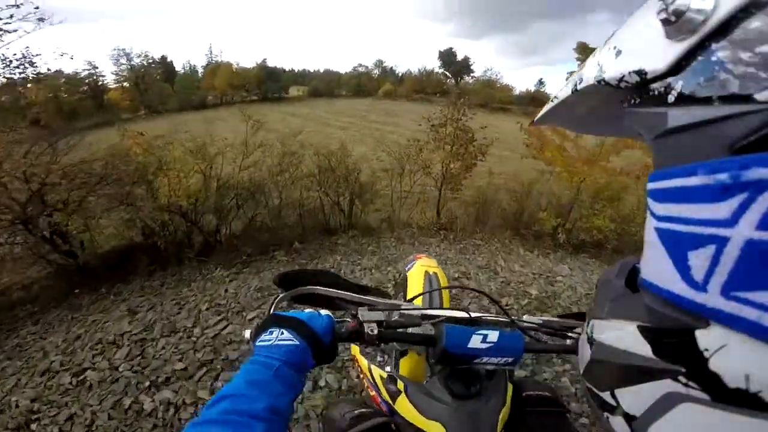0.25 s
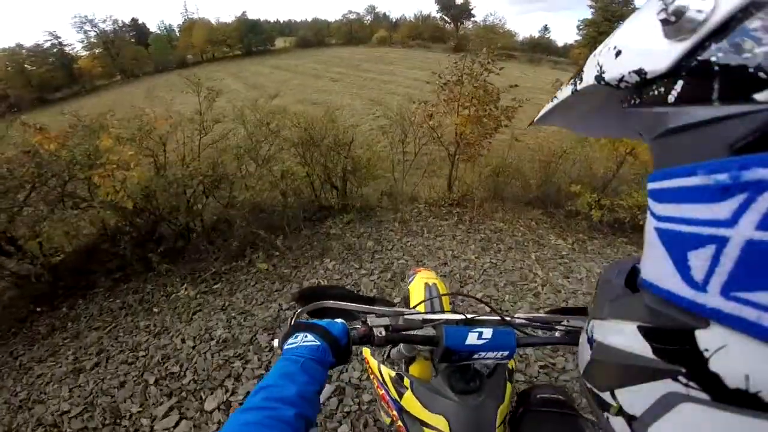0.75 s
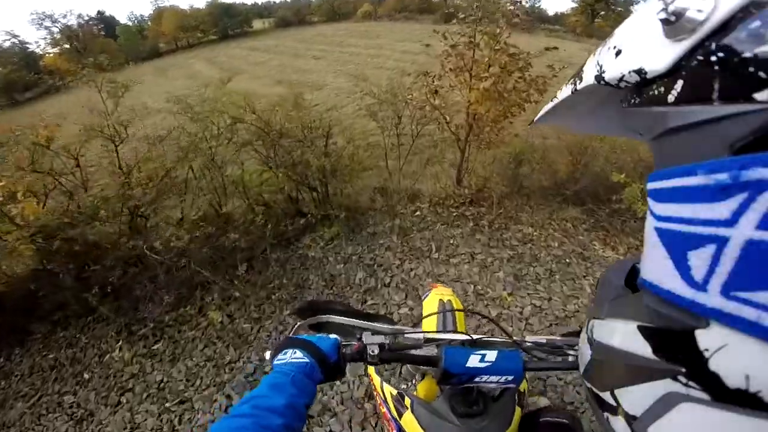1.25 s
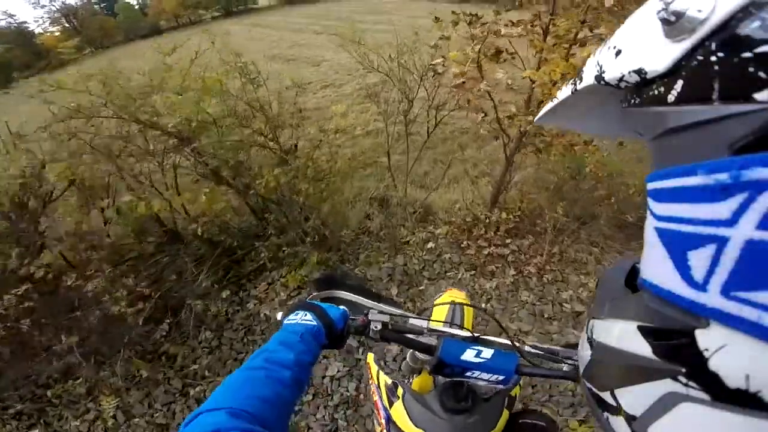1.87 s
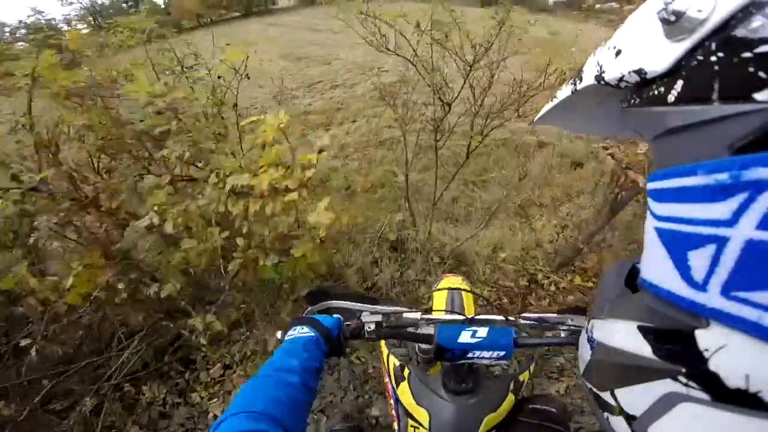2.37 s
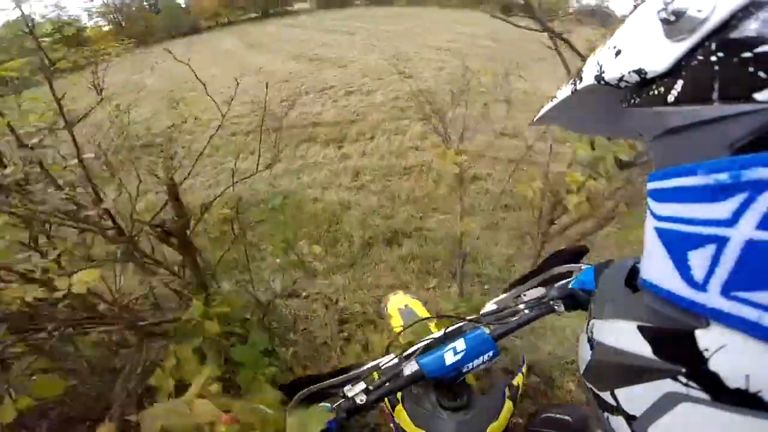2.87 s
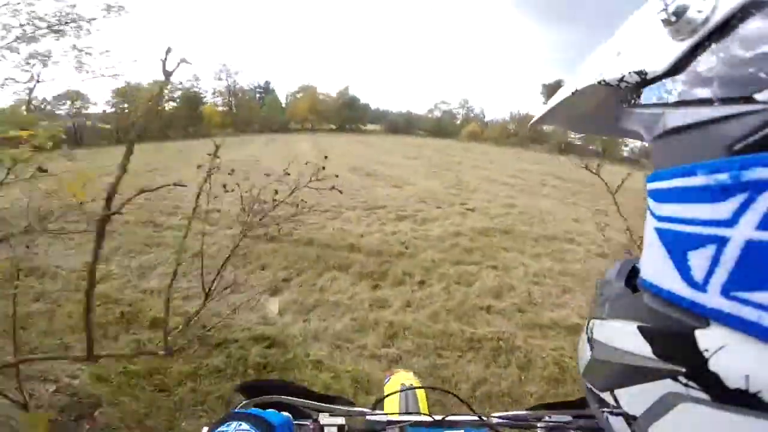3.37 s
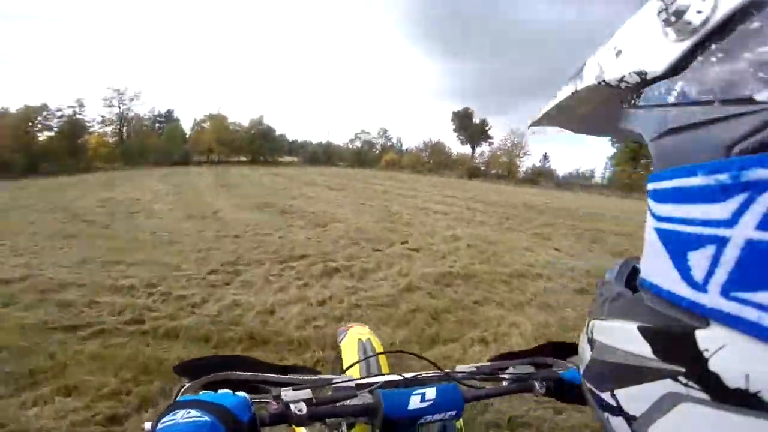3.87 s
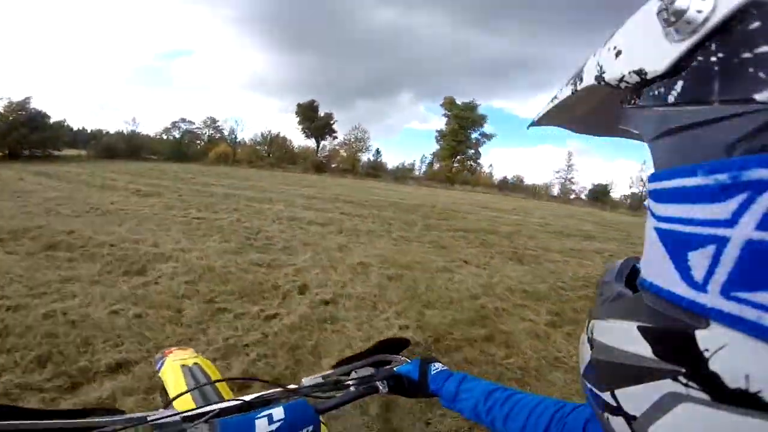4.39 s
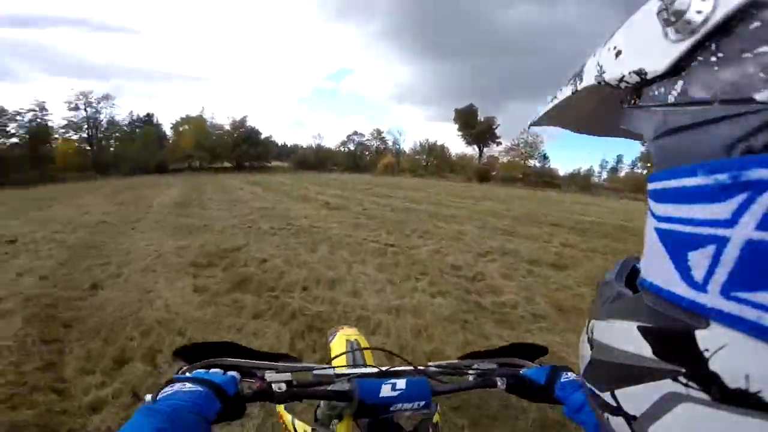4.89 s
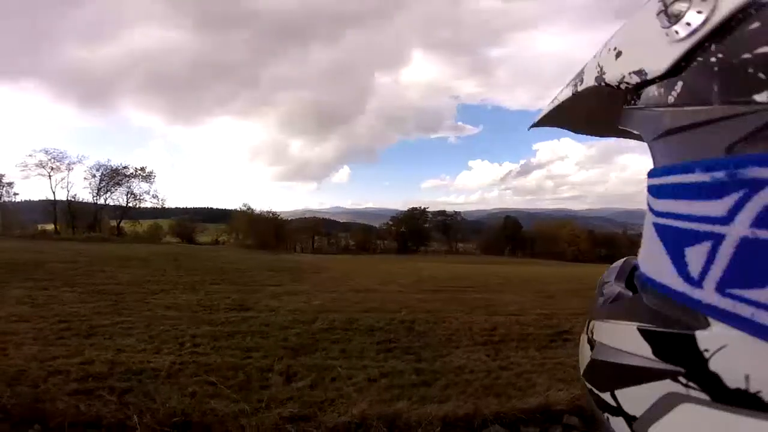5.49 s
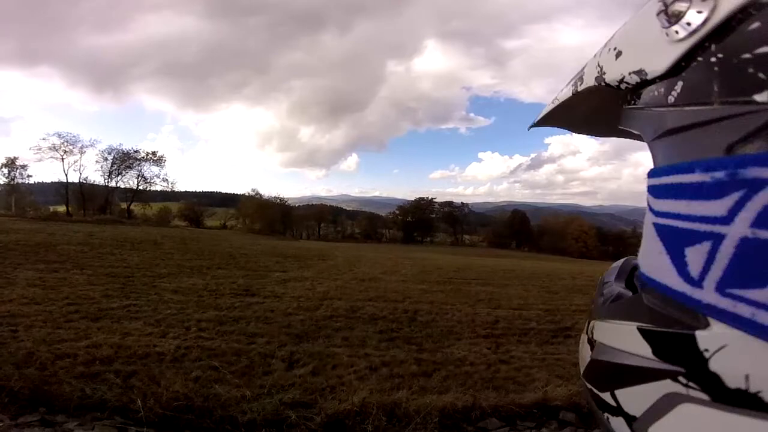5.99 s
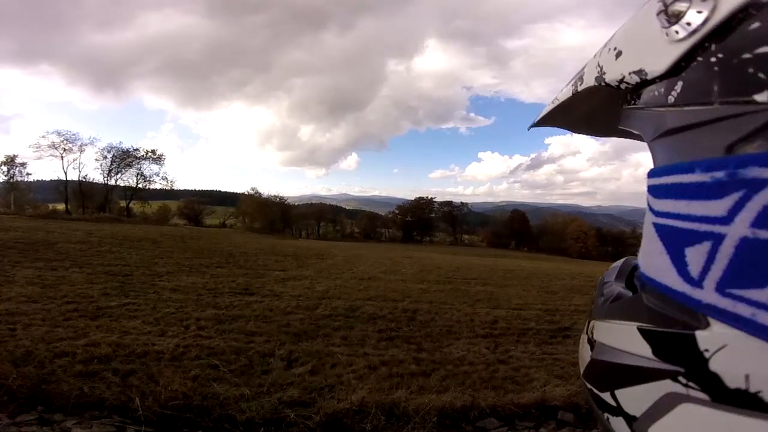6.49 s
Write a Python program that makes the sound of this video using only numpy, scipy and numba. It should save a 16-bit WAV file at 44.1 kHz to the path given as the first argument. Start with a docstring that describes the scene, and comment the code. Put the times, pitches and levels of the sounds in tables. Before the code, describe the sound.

A dirt bike idles unevenly over crunching stones, scrapes through a bush, then revs across grass before cutting abruptly to faint, gusty wind.

```python
"""A single-cylinder four-stroke off-road bike, heard from a camera beside the helmet, idles over loose stones:
uneven pops and pumping thumps with many weak firings, over noise ringing the cases, crunching ground and ticks.
It pushes through a bush in a flurry of struck resonances, then opens up across a meadow: faster pops bark and rasp,
low orders drone, the cases whine and a loose part buzzes.
A hard cut leads to a still, windy field: low buffeting, single puffs on the microphone and a faint noise bed."""
import sys
import numpy as np
from scipy import signal
from scipy.fft import rfft, irfft
from scipy.io import wavfile
from scipy.ndimage import uniform_filter1d
from numba import njit

SR = 44100
rng = np.random.default_rng(int(sys.argv[2]) if len(sys.argv) > 2 else 0)


def digitize_waveform(pressure):
    """Quantize a signal to 16-bit integers and store it at the path in sys.argv[1].

    Rows of a 2-D input are taken as channels; values are limited to [-1, 1].
    """
    field = np.atleast_2d(pressure).T
    bounded = np.clip(field, -1, 1)
    quanta = np.round(bounded * 32767).astype(np.int16)
    wavfile.write(sys.argv[1], SR, quanta)


N = 297521


def undb(db):
    """Gain of a level in dB."""
    return 10 ** (np.asarray(db) / 20)


def level(x, db):
    """Scale to an rms level."""
    return x * undb(db) / np.sqrt(np.mean(x ** 2))


def curves(table):
    """Each column of a (start_s, ..) table as a value per sample."""
    s, *columns = np.transpose(table)
    return [np.interp(np.arange(N) / SR, s, c) for c in columns]


@njit
def svf(x, hz, width):
    """State-variable band-pass, gain 1 at the centre."""
    y, b, l = np.empty(len(x)), 0., 0.
    g, k = np.tan(np.pi * hz / SR), width / hz
    for i in range(len(x)):
        v = (b + g * (x[i] - l)) / (1 + g * (g + k))
        b, l, y[i] = 2 * v - b, l + 2 * g * v, k * v
    return y


@njit
def glide(x, hz, width):
    """The same band-pass with a centre that moves."""
    y, b, l = np.empty(len(x)), 0., 0.
    for i in range(len(x)):
        g, k = np.tan(np.pi * hz[i] / SR), width / hz[i]
        v = (b + g * (x[i] - l)) / (1 + g * (g + k))
        b, l, y[i] = 2 * v - b, l + 2 * g * v, k * v
    return y


def band(x, hz, width_hz):
    """Steep band: the resonance applied twice."""
    return svf(svf(x, float(hz), float(width_hz)), float(hz), float(width_hz))


def coloured(x, spectrum):
    """Give white sound a (pitch_hz, density_db) spectrum."""
    hz, db = np.transpose(spectrum)
    f = np.log(np.arange(N // 2 + 1) * SR / N + 1)
    return irfft(rfft(x) * undb(np.interp(f, np.log(hz), db, left=-90, right=-90)), N)


def walk(rate):
    """Random levels held 1 / rate s and slewed twice; spread near 1."""
    k = int(SR / rate)
    steps = np.repeat(rng.standard_normal(N // k + 1), k)
    return 1.87 * uniform_filter1d(uniform_filter1d(steps, k), k)[:N]


def grains(rate, spread_db, tail_s):
    """Noise that comes in short bursts of uneven size."""
    sizes = undb(spread_db * np.minimum(rng.exponential(size=N), 3.5))
    starts = (rng.random(N) < rate / SR) * sizes
    tails = signal.lfilter([1], [1, -np.exp(-1 / (tail_s * SR))], starts)
    return tails * rng.standard_normal(N)


def delayed(x, s):
    """The same sound s seconds later."""
    return np.r_[np.zeros(int(s * SR)), x][:N]


def bursts(table, width_s):
    """A bell-shaped swell of gain at each (start_s, gain_db) row, centred there."""
    t = np.arange(N) / SR
    return sum(undb(db) * np.exp(-((t - s) / width_s) ** 2 / 2) for s, db in table)


# engine speed: start_s [s], firing_rate [firings per second]
SPEED = [(0.0, 22.15), (0.4, 21.68), (0.8, 23.99), (0.9, 22.82), (1.2, 21.99), (1.9, 23.14), (2.0, 21.84),
         (2.3, 21.34), (3.3, 22.34), (3.5, 20.92), (3.6, 24.0), (3.7, 36.35), (3.85, 38.12), (4.25, 31.28),
         (4.3, 31.41), (4.35, 28.32), (4.55, 27.66), (4.85, 32.33), (5.05, 32.25), (5.4, 36.61)]
START_TURN = -.215  # place in the cycle at the start
POP_S = .003  # s from the start of a cycle to its pop


def crank():
    """Cycle number, place in the cycle (0-1) and seconds since it began; the pop comes POP_S after that."""
    t, hz = np.arange(N) / SR, curves(SPEED)[0]
    turns = START_TURN + np.cumsum(hz) / SR + hz * POP_S
    whole = np.floor(turns)
    return whole.astype(int) + 1, turns % 1, t - np.interp(whole, turns, t)


# engine load: start_s [s], throttle [0-1], pop_db [dB], silencer_ring [share], upper_ring [share],
# pipe_echo [share], pumping_thump_db [dB]
LOAD = [(0, 0, -1.2, 1.2, .1, .25, -.8), (3.47, 0, -1.2, 1.2, .1, .25, -.8), (3.62, 1, 1.5, .1, .6, .5, -6),
        (3.82, 1, 1, .3, .8, .45, -9), (3.9, 1, -1.3, 1.4, .9, .22, -9), (4.2, 1, -1.8, 1.6, .6, .25, -11),
        (4.6, 1, -2, 1.9, 2.1, .33, -9), (4.75, 1, -2, 1.8, 2.1, .33, -9.5), (4.93, 1, 0, .4, .6, .33, -11),
        (5.4, 1, 0, .3, .7, .33, -11)]
# at idle a full burn spoils the next charge, so every second firing is weak:
# first_weak_s [s], last_weak_s [s], pop_db [dB relative to a full one]
WEAK_RUNS = [(.064, .064, -13), (.291, .291, -8), (.477, .655, -13), (.78, 1.493, -14), (1.623, 1.623, -14),
             (1.755, 2.02, -10), (2.066, 2.807, -17), (2.943, 3.214, -9), (3.26, 3.26, -9),
             (3.49, 3.49, -13), (.019, .019, -3), (.156, .156, -2), (.202, .202, -3), (.739, .739, -3),
             (1.581, 1.581, -3), (1.711, 1.711, -3), (1.974, 1.974, -3), (2.898, 2.989, -3.5),
             (3.305, 3.396, -6), (3.35, 3.35, -5.5), (3.442, 3.442, -2)]
# resonances of the exhaust pipe: pitch_hz [Hz], width_hz [Hz], gain_db [dB]
PIPE = [(62, 28, -1), (132, 13, 3)]
# low orders of the cycle that drone under load: order [times a cycle], level_db [dB], place [share of its period]
SHAKE = [(2, -27.5, .32), (4, -28, .39), (5, -30, .1)]
WEAK_SCATTER_DB, FULL_SCATTER_DB = 1.8, 1.1  # doubled at idle
POP_WIDTH_S, POP_JITTER_S, POP_ECHO_S = .00074, .00015, .0062
FRONT, TAIL = .7, 1.45  # the dip sets in much faster, the peak dies this much slower
SILENCER_HZ, IDLE_SILENCER_HZ, SILENCER_WIDTH_HZ = 316, 311.4, 75.  # cooler gas rings lower
SILENCER_WANDER = .068  # each idle firing differs by about this share
RASP_HZ, RASP_WIDTH_HZ, RASP_DB = 1220., 120., -13
RUSH_PHASE, RUSH_WIDTH, RUSH_DB = .896, .051, -36  # place and width as shares of the cycle
SURGE_S, SURGE_WIDTH_S, SURGE = .0104, .0017, .3
BARK_HZ, BARK_WIDTH_HZ, BARK_S, BARK_DB = 665., 85., .0085, -3
STROKE_START, STROKE_END = .24, .345  # share of the cycle where the pumping push starts and ends
PUSH_CURVE = 1.9  # how late in the stroke the push builds
THUMP_ECHO_S, THUMP_ECHO = .006, .37
TRAP_HZ, TRAP_WIDTH_HZ, TRAP = 100., 45., .75


def exhaust(cycle, phase, since):
    """A pop as the valve opens, then the piston's push, which is cut off sharply and rings the pipe."""
    throttle, pop_db, ring, upper, pop_echo, thump_db = curves(LOAD)
    idle = 1 - throttle
    draws = rng.standard_normal((200, 4))
    chance = draws[cycle].T  # four random values, new for each cycle

    weak_db = np.zeros(200)
    for first_s, last_s, db in WEAK_RUNS:
        weak_db[cycle[int(first_s * SR)]:cycle[int(last_s * SR)] + 1:2] = db
    weak_scatter = WEAK_SCATTER_DB * draws[:, 3]
    full_scatter = -FULL_SCATTER_DB * abs(draws[:, 3])
    scatter_db = np.where(weak_db < 0, weak_scatter, full_scatter)
    burn = undb(weak_db[cycle] + (2.0 - throttle) * scatter_db[cycle])

    # a puff of gas radiates as its slope: a dip, then a peak
    u = (since - POP_S - POP_JITTER_S * chance[3]) / POP_WIDTH_S
    u = np.clip(u, -1, 1) + np.minimum(u + 1, 0) / FRONT + np.maximum(u - 1, 0) / TAIL
    pop = u * np.exp(-u ** 2 / 2) * burn * undb(pop_db + .5 * chance[0])

    ring_hz = throttle * SILENCER_HZ + idle * IDLE_SILENCER_HZ * (1 + SILENCER_WANDER * chance[0])
    ring_gain = ring * undb((1.0 - 0.62 * throttle) * chance[1])
    pop = pop + ring_gain * glide(pop, ring_hz, SILENCER_WIDTH_HZ)
    pop = pop + upper * .6 * svf(pop, 500., 45.)
    # the sharp front of the puff rings a higher mode under load
    rasp = svf(np.exp(-8 * u ** 2), RASP_HZ, RASP_WIDTH_HZ)
    pop = pop + upper * undb(RASP_DB + 1.5 * chance[2]) * rasp
    pop = pop + pop_echo * delayed(pop, POP_ECHO_S)

    # gas rasps past the valve just before it pops
    rush_noise = level(band(rng.standard_normal(N), RASP_HZ, 240), RUSH_DB)
    rush = np.exp(-((phase - RUSH_PHASE) / RUSH_WIDTH) ** 2 / 2) * rush_noise
    # at idle a full burn comes back down the pipe as a slow surge
    v = (since - SURGE_S) / SURGE_WIDTH_S
    surge = SURGE * burn * v * np.exp(-v ** 2 / 2)
    pop = pop + upper * throttle * rush + idle * surge
    # a late ring follows each pop, strong under load
    bark = svf(delayed(np.exp(-2 * u ** 2), BARK_S), BARK_HZ, BARK_WIDTH_HZ)
    pop = pop + upper * undb(BARK_DB + chance[1]) * bark

    stroke = np.clip((phase - STROKE_START) / (STROKE_END - STROKE_START), 0, None)
    cut_off = STROKE_END + .01 * (1 - .8 * throttle) * chance[2]
    push = stroke ** PUSH_CURVE * (phase < cut_off)
    push = push * (.95 + .05 * burn) * undb(thump_db + (1.5 - throttle) * chance[1])
    push = uniform_filter1d(uniform_filter1d(push, size=36), size=34)
    # at idle burnt gas keeps flowing out after the pop; after a weak firing it is sucked back
    flow = idle * (.4 * burn - .24 + .09 * chance[2])
    push = push + flow * np.exp(-((since - .0055) / .0022) ** 2 / 2)

    # the open pipe end returns the push upside down
    edges = push - THUMP_ECHO * uniform_filter1d(delayed(push, THUMP_ECHO_S), size=40)
    edges = signal.lfilter(*signal.butter(1, 110, "high", fs=SR), edges)
    pipe = sum(undb(db) * svf(push, float(hz), float(w)) for hz, w, db in PIPE)
    shake = throttle * sum(undb(db) * np.cos(2 * np.pi * (round(k) * phase + at)) for k, db, at in SHAKE)
    gas = pop + edges + pipe
    # under load the pipe swallows a band
    return gas - TRAP * throttle * svf(gas, TRAP_HZ, TRAP_WIDTH_HZ) + shake


# engine cases and valve gear: pitch_hz [Hz], width_hz [Hz], idle_db [dB], open_throttle_gain_db [dB]
CASES = [(461, 252, 1.5, 0.5), (624, 137, 3, -1.5), (813, 160, -7.5, 2), (1094, 260, -8.5, 8.5),
         (1788, 616, 4, 0), (2075, 680, -5.5, -7), (3080, 480, -2, -0.5), (3376, 750, -13, 5),
         (4820, 440, -13, -4.5), (6130, 540, -17, -0.5), (7740, 310, -30.5, 4.5), (10090, 1100, -36, -10)]
# clatter over time: start_s [s], gain_db [dB], gain_under_1_khz_db [dB], gain_of_ring_near_850_hz_db [dB]
CLATTER = [(0, -32, 2, 10.5), (.95, -30.5, -4.5, 14), (1.3, -30, 1.5, 4), (2.7, -33.5, 3.5, -32),
           (3.1, -32, 8, -16), (3.5, -35.5, 6, 9), (3.8, -34, 8.5, -14), (4.15, -35.5, 1.5, 0),
           (4.4, -31.5, 5.5, 0.5), (4.8, -34.5, 6, -9), (5.4, -38, 10, -10)]


def clatter(phase):
    """Valve gear and gas noise in the case resonances, louder at valve events twice a cycle."""
    beat = 1 + 0.68 * np.exp(-phase / 0.69) + 0.31 * np.exp(-((phase + .5) % 1) / 0.087)
    drive = beat * (rng.standard_normal(N) + level(grains(400, 3.7, 0.0035), -2.3))
    throttle = curves(LOAD)[0]
    all_db, low_db, ring_db = curves(CLATTER)
    # under load the lower resonances sound while the gas leaves
    outflow = 1 + throttle * (1.3 * np.exp(-((phase - .36) / .1) ** 2 / 2) - .15)
    out = np.zeros(N)
    for hz, w, db, open_db in CASES:
        excitation = drive * (outflow if hz < 1000 else 1)
        gain_db = db + open_db * throttle + low_db * (hz < 1000) + ring_db * (750 < hz < 1000)
        out += level(band(excitation, hz, w), gain_db + 1.1 * walk(9))
    return undb(all_db - 5.5) * out


# a ring of the cases that sings under load: start_s [s], pitch_hz [Hz], gain_db [dB]
WHINE = [(3.5, 1700, -39), (3.68, 1646, -36.5), (3.9, 1625, -37.5), (4.25, 1610, -39.5), (4.5, 1615, -36),
         (4.75, 1675, -35.5), (4.9, 1797, -36.5), (5.4, 1800, -58)]
WHINE_WIDTH_HZ = 200.


def whine(phase):
    """Gas noise in one narrow gliding ring, strongest as each cycle begins."""
    hz, db = curves(WHINE)
    drive = (.5 + np.exp(-phase / .4)) * rng.standard_normal(N)
    ring = glide(glide(drive, hz, WHINE_WIDTH_HZ), hz, WHINE_WIDTH_HZ)
    return level(ring, 0) * undb(db) * curves(LOAD)[0]


# a loose part that buzzes once a cycle: start_s [s], gain_db [dB]
RATTLE = [(4.74, -78), (4.8, -52), (4.87, -47), (5.0, -50), (5.08, -49.5), (5.17, -75)]
RATTLE_PHASE = 0.6  # share of the cycle


def rattle(phase):
    """A thin buzz kicked at the same point of every cycle."""
    kick = np.exp(-((phase - RATTLE_PHASE) % 1) / 0.35)
    return level(kick * band(rng.standard_normal(N), 6200, 3900), 0) * undb(curves(RATTLE)[0])


# stones and twigs that strike bike or camera:
# start_s [s], gain_db [dB], centre_hz [Hz], crack_gain_db [dB], knock_gain_db [dB]
HITS = [(0.121, -6, 2210, -42, -7), (0.243, -22, 1690, -19, -14), (0.398, -14, 1660, -29, -20),
        (1.2734, -13, 2240, -30, -9), (2.3584, -12, 3220, -22, -26), (2.396, -18, 2120, -24, -25),
        (2.703, -10, 1900, -6, -16), (2.772, -14, 3200, -30, -25), (2.7785, -6.5, 3800, -15, -8),
        (2.9314, -10.5, 2980, -27, -8), (2.933, -12, 1705, -30, -2), (2.949, -8.5, 1400, -25, -12),
        (2.954, -10, 2900, -24, -28), (3.0425, -10.5, 3050, -28, 0.5), (3.092, -10, 1800, -25, -9.5),
        (3.1132, -9, 1930, -33, -9.5), (3.185, -3, 3220, -5.5, -17), (3.1848, -3, 1960, -16.5, -26),
        (3.191, 2, 1700, -19, -25.5), (3.193, -12, 3090, -11.5, -25), (3.197, 1, 946, -26.5, -5),
        (3.204, -15.5, 600, -22, 6.5), (3.208, -17, 2100, -36.5, -16.5), (3.216, -7.5, 2070, -30, -2.5),
        (3.492, -15.5, 2010, 3.5, -21), (3.542, -29, 2040, 10.5, -6), (3.81, -23, 1620, -3, -22)]
# what they set ringing: pitch_hz [Hz, before a small detune], gain_db [dB], t60_s [s]
STRUCK = [(530, 1.5, 0.023), (1102, -1.5, 0.046), (1810, -9, 0.075), (2078, -4.5, 0.054),
          (3043, -2.5, 0.033), (3347, -1, 0.029)]
HIT_T60_S, STRUCK_DB = .022, -10.5


def hits():
    """Each blow: a short burst that rings the modes near its centre, a dry crack above, a dull knock below."""
    out, t = np.zeros(N), np.arange(4096) / SR
    fade = np.exp(-np.log(1000) * t / HIT_T60_S)
    noises = rng.standard_normal((len(HITS), 3, 4096))
    for (s, db, hz, crack_db, knock_db), noise in zip(HITS, noises):
        burst = level(band(noise[0], hz, 0.45 * hz), -11.0)
        crack = level(band(noise[1], 5900, 13000), crack_db - 13.5)
        knock = level(band(noise[2], 390, 500), knock_db - 1.0)
        rings = np.zeros(4096)
        for (f, g, t60), detune in zip(STRUCK, noise[2]):
            # modes far from the centre of the blow ring less
            gain = undb(g - 7 * abs(np.log2(f / hz)))
            tone = np.sin(2 * np.pi * f * (1 + 0.035 * detune) * t)
            rings += gain * tone * np.exp(-np.log(1000) * t / t60)
        blow = (burst + crack + knock) * fade + undb(STRUCK_DB) * rings
        i = int(s * SR)
        out[i:i + 4096] += undb(db) * blow * np.clip(t / .0003, 0, 1)
    return out


# stones, leaves and grass under the tyres: start_s [s], gain_db [dB], dry_rustle_db [dB]
GROUND = [(0, -50, -24), (.35, -41.5, -17), (.5, -52.5, -23.5), (1.1, -60, -43), (1.4, -39, -22.5),
          (1.7, -36.5, -27.5), (2.5, -36.5, -25.5), (2.9, -36.5, -15.5), (3.15, -34.5, -20),
          (3.3, -36, -14), (3.58, -42.5, -13.5), (3.84, -49, -15), (3.92, -59, -18.5), (5.4, -73, -33)]
# colour of the crunch: pitch_hz [Hz], density_db [dB per Hz, relative]
CRUNCH = [(1470, -15), (2500, 0), (3170, -1), (4170, -6.5), (6060, -3.5), (7050, -10.5), (8420, -10.5),
          (12000, -56.5), (15600, -61.5), (22000, -120)]
# stones that shift under a tyre with a short crunch: start_s [s, centre], gain_db [dB]
CRUNCHES = [(.01, -38), (.13, -39), (.2, -42), (.25, -40), (.32, -42), (.4, -43), (.78, -39), (1.04, -39.5),
            (1.08, -45.5), (1.2, -44), (1.275, -40), (1.4, -42), (1.73, -72), (2.12, -48), (2.32, -39.5),
            (2.5, -39), (3.2, -21.5)]
CRUNCH_S = 0.0089


def ground():
    """Dense crunch of small stones, stalks and leaves: grains and hiss with a dry rustle above."""
    all_db, dry_db = curves(GROUND)
    crunch = level(grains(600, 0.71, 0.0016), 0) + 0.78 * rng.standard_normal(N)
    stones = level(coloured(crunch, CRUNCH), 0.23)
    rustle = level(band(crunch, 10650, 4500), dry_db + .1)
    return (stones + rustle) * (undb(all_db + .6 * walk(30)) + bursts(CRUNCHES, CRUNCH_S))


# twigs and pebbles that tick: start_s [s], gain_db [dB]
TICKS = [(1.3851, -42), (1.5168, -36), (1.614, -29), (1.662, -27), (1.7897, -39), (1.8266, -39),
         (2.0461, -32), (2.12, -23), (2.2123, -32), (2.3165, -34), (2.5236, -24), (2.602, -37),
         (2.755, -24), (3.0209, -38)]
TICK_S = 0.0034


def ticks():
    """Tiny bright snaps: high noise that dies away within milliseconds."""
    starts = np.zeros(N)
    for s, db in TICKS:
        starts[int(s * SR)] = undb(db)
    fade = signal.lfilter([1], [1, -np.exp(-1 / (TICK_S * SR))], starts)
    return fade * level(band(rng.standard_normal(N), 7000, 4000), -8.0)


def wind(hz, width_hz):
    """Low buffeting on the microphone: band noise with a wandering level."""
    return level(band(rng.standard_normal(N), hz, width_hz) * undb(0.8 * walk(13)), 0)


# single puffs of wind in the still field: start_s [s, centre], gain_db [dB], way [+1 push or -1 pull]
GUSTS = [(5.448, -45, -1), (5.585, -43, 1), (5.635, -48, -1), (5.688, -41, -1), (5.79, -43, -1),
         (5.83, -40, 1), (5.852, -43, -1), (5.963, -35, 1), (6.091, -41, -1), (6.103, -36, 1),
         (6.16, -46, 1), (6.272, -43.5, -1), (6.325, -44, 1), (6.55, -54, -1)]
GUST_S = 0.0036


def puffs():
    """Each puff pushes or pulls the membrane once."""
    return sum(np.sign(way) * bursts([(s, db)], GUST_S) for s, db, way in GUSTS)


# wind on the microphone in the still field: start_s [s], gain_db [dB]
BREEZE = [(5.38, -58), (5.8, -54), (6.15, -55), (6.4, -59), (6.75, -60)]
# colour of the field's noise bed: pitch_hz [Hz], density_db [dB per Hz, relative]
FIELD = [(100, -23), (170, -6.5), (231, -11), (262, -5.5), (286, -8.5), (599, -12), (1100, -17.5),
         (1730, -17.5), (12500, -37), (16200, -63.5), (22000, -120)]
FIELD_DB = -60


def still_field():
    """Unsteady low wind, single puffs and a faint coloured noise bed."""
    breeze = undb(curves(BREEZE)[0] + 1.9 * walk(34)) * wind(24, 49)
    bed = level(coloured(rng.standard_normal(N), FIELD), FIELD_DB)
    return breeze + puffs() + bed


RIDE_WIND_DB = -28
CUT_S, FADE_S = 5.3645, .014


def scene():
    """The ride, faded out quickly at the cut, over the quiet field."""
    cycle, phase, since = crank()
    engine = exhaust(cycle, phase, since) + clatter(phase) + whine(phase) + rattle(phase)
    ride = engine + hits() + ground() + ticks()
    ride = ride + undb(RIDE_WIND_DB) * wind(44, 22)
    ride = ride + undb(-30 - 8 * curves(LOAD)[0]) * wind(200, 350)
    # the whole ride has little deep bass
    ride = signal.sosfilt(signal.butter(2, 30, "high", fs=SR, output="sos"), ride)
    before = np.clip((CUT_S - np.arange(N) / SR) / FADE_S, 0, 1) ** 0.89
    return (before * ride + still_field())[None]


TOP_HZ = 15300


def record(dry):
    """The camera cuts the deepest bass, rounds the loudest peaks and cuts the top."""
    dry = signal.sosfilt(signal.butter(2, 14, "high", fs=SR, output="sos"), dry)
    rounded = np.tanh(.9 * dry) / .9
    return signal.sosfilt(signal.ellip(8, .2, 70, TOP_HZ, fs=SR, output="sos"), rounded)


dry = scene()
out = record(dry)
digitize_waveform(out)
```